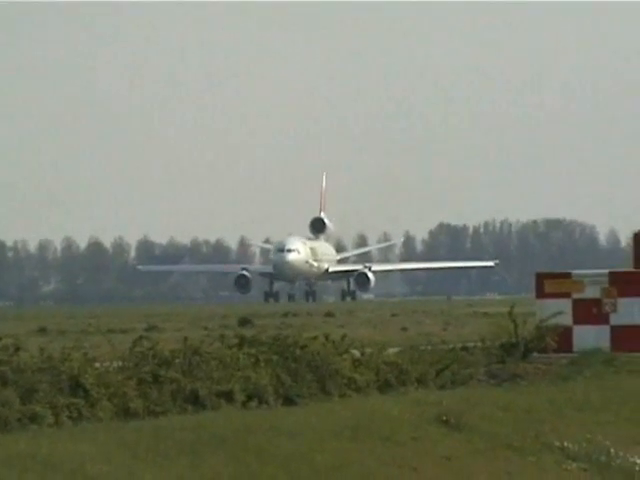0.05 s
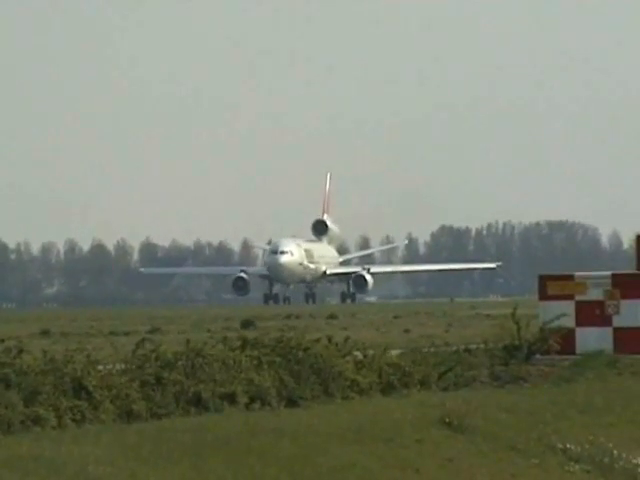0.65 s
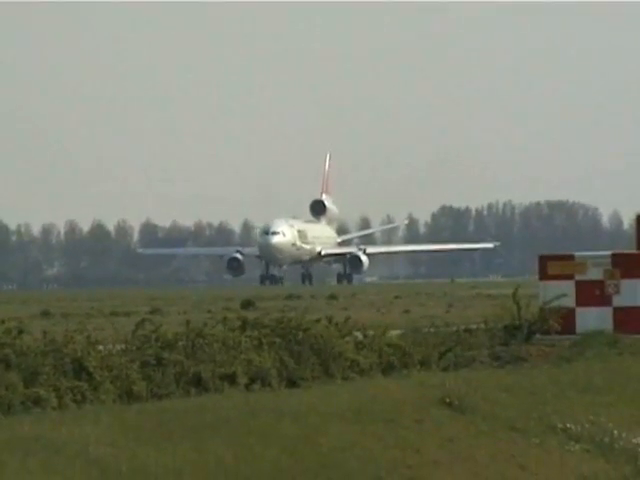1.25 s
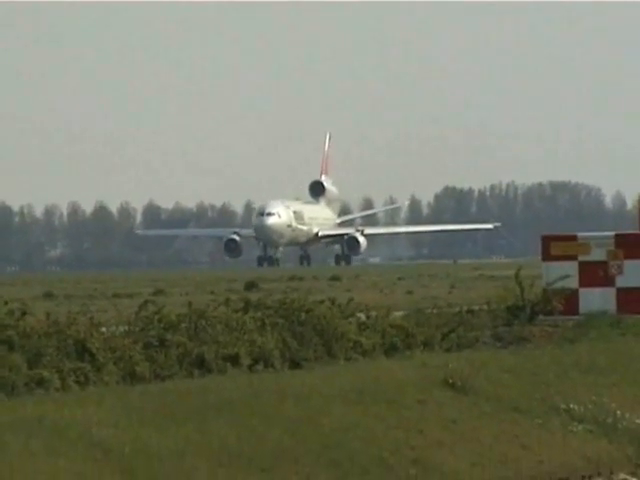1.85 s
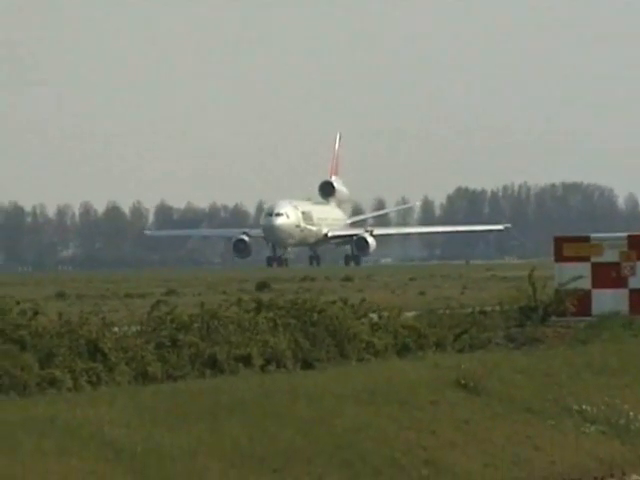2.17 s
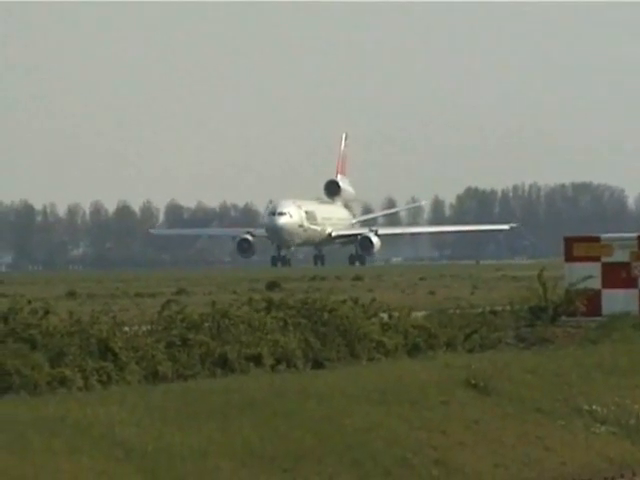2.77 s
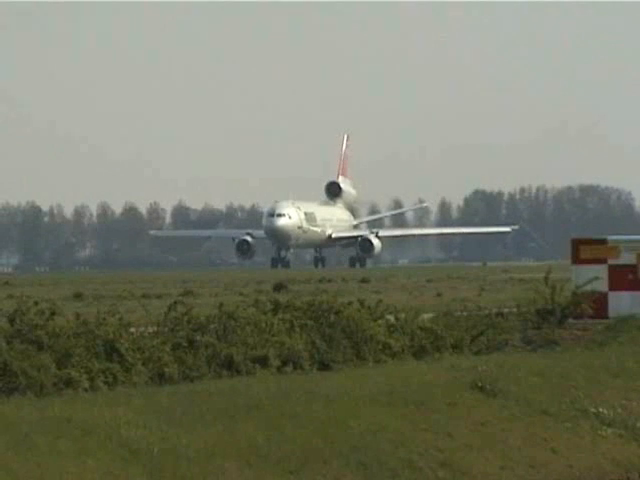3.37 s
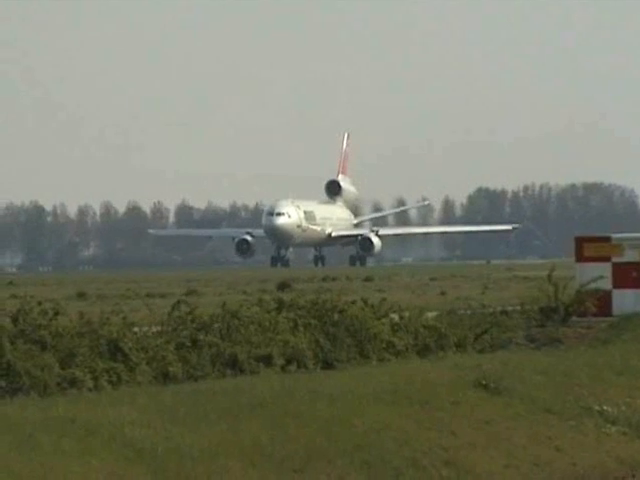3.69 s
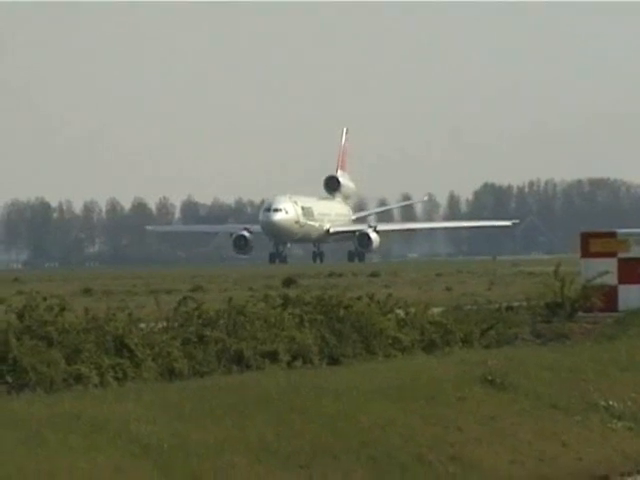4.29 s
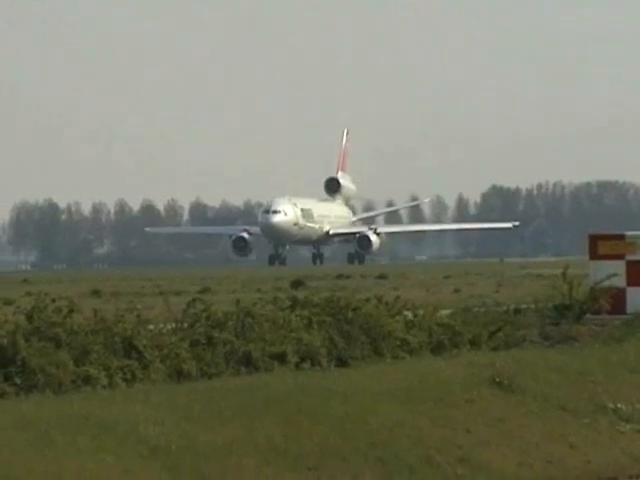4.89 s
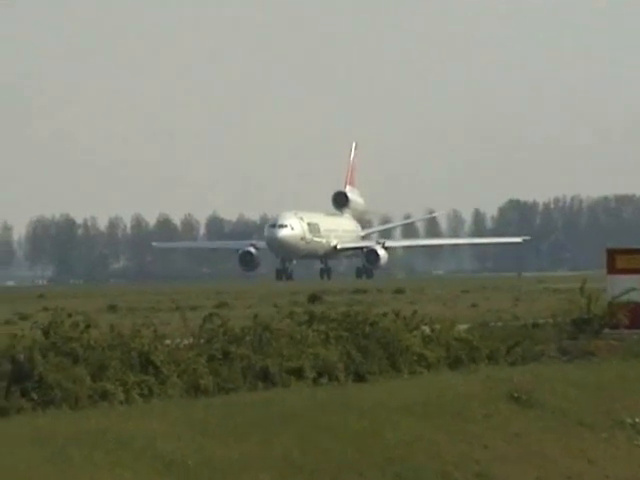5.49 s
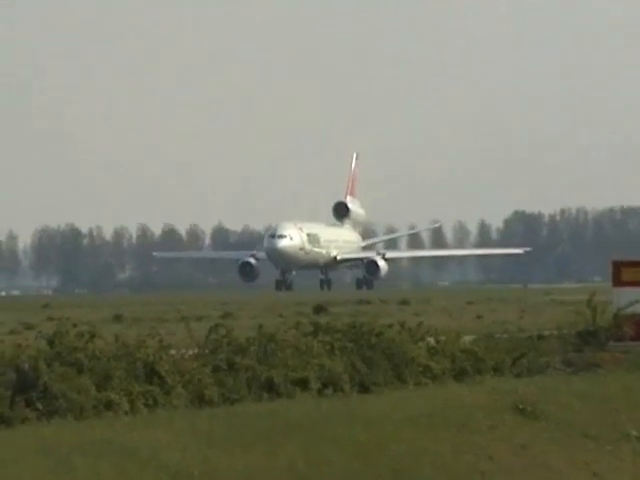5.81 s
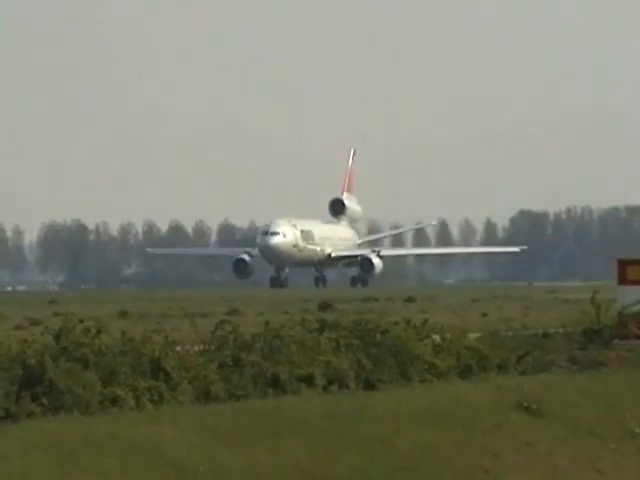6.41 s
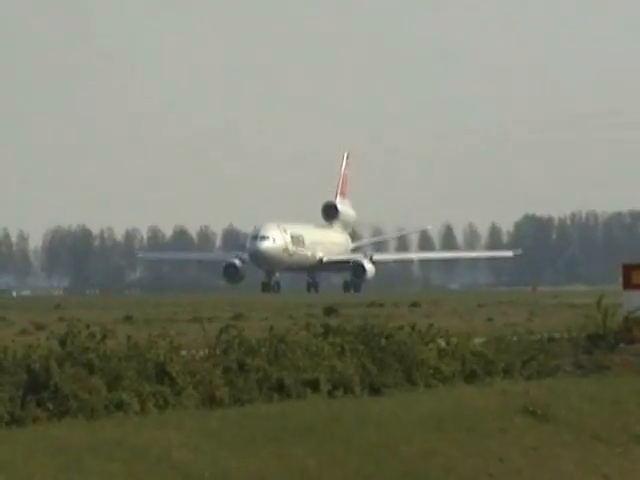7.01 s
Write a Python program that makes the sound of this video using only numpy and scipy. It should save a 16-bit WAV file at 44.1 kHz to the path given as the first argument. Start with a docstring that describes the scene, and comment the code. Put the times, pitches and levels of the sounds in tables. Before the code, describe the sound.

Jet engines spool up with a rising whine over a rushing roar, while wind gusts thump and crackle on the microphone.

```python
"""On the grass beside a runway, a three-engined airliner speeds up its engines for takeoff.
Three spinning fans whine higher and higher, each at its own speed, and shock waves from the blades buzz.
Air hisses into the engines and roars out behind them. Gusts thump and crackle on the microphone
and make the camera turn everything down, the aircraft included.
The loudest gust peaks are flattened and sound slightly rough."""
import sys
import numpy as np
from scipy import signal
from scipy.fft import rfft, irfft, next_fast_len
from scipy.io import wavfile

SR = 44100
rng = np.random.default_rng(int(sys.argv[2]) if len(sys.argv) > 2 else 0)


def generate_wav(signal):
    """Clip the signal to [-1, 1] and save it as 16-bit WAV at the path in sys.argv[1]."""
    frames = np.transpose(np.atleast_2d(signal))
    scaled = np.clip(frames, -1, 1) * 32767
    pcm = np.round(scaled).astype(np.int16)
    wavfile.write(sys.argv[1], SR, pcm)


N = 310905
TIME_S = np.arange(N) / SR
BLADES = 38   # on each fan


def from_db(db):
    """Turn decibels into a number to multiply a sound by."""
    return 10 ** (np.asarray(db) / 20)


def unit_power(x):
    """Scale a signal so that its average power is 1."""
    return x / np.sqrt(np.mean(np.abs(x) ** 2) + 1e-20)


def over_time(rows):
    """Join a table's rows with straight lines: one curve for each column after the time."""
    times_s, *columns = np.transpose(rows)
    return [np.interp(TIME_S, times_s, column) for column in columns]


def at_pitch(rows, hz):
    """Look up a table's value at a pitch, spacing the octaves evenly."""
    pitches_hz, values = np.transpose(rows)
    return np.interp(np.log(hz + 1), np.log(pitches_hz), values)


def smooth(x, seconds):
    """Soften sudden changes by following them with a lag."""
    keep = np.exp(-1 / (seconds * SR))
    return signal.lfilter([1 - keep], [1, -keep], x)


def drift(per_s):
    """A random wander of about 1 either way, changing roughly per_s times a second."""
    keep = np.exp(-40 * np.pi * per_s / SR)
    noise = rng.standard_normal(N // 20 + 4002)   # one value every 20 samples, plus a run-in
    slow = signal.lfilter([1], [1, -2 * keep, keep * keep], noise)[4000:]
    return np.interp(np.arange(N) / 20, np.arange(len(slow)), unit_power(slow))


def stereo_noise(colour, likeness):
    """Coloured noise whose left and right are the same (likeness 1), unrelated (0) or opposite (-1)."""
    size = next_fast_len(N, real=True)
    hz = np.arange(size // 2 + 1) * SR / size
    shared, opposed = rfft(rng.standard_normal((2, size))) * from_db(at_pitch(colour, hz))
    alike = np.clip(at_pitch(likeness, hz), -1, 1)
    spectrum = np.sqrt(1 + alike) * shared + np.sqrt(1 - alike) * opposed * [[1], [-1]]
    return unit_power(irfft(spectrum, size)[:, :N])


def scattered_tone(hz, waver, fuzz, waver_hz, fuzz_hz):
    """A tone that has crossed swirling air: it wavers slowly and gains a fast, noisy fuzz."""
    slow = drift(waver_hz) + 1j * drift(waver_hz)
    fast = drift(fuzz_hz) + 1j * drift(fuzz_hz)
    pure = np.exp(2j * np.pi * np.cumsum(hz) / SR)
    return unit_power(np.real(pure * (1 + waver * slow + fuzz * fast)))


# How strong a fan's sounds are at each speed: whine_hz, whine_db, blade_tone_db, buzz_db
FAN_LEVELS = [(1520, -41.5, -66, -42), (1940, -35.5, -52.5, -40.5), (2270, -38.5, -58, -38.5),
              (2416, -32.5, -54.5, -43), (2990, -39.5, -41.5, -50), (3288, -47.5, -49, -41),
              (3540, -50, -38.5, -50), (3740, -51, -37.5, -45), (3840, -49.5, -30.5, -47)]

def fan_levels(whine_hz):
    """As a fan speeds up, its whine gives way to the tone of the passing blades, an octave lower."""
    pitches_hz, *columns = np.transpose(FAN_LEVELS)
    return [np.interp(whine_hz, pitches_hz, column) for column in columns]


# The octave above the whine grows with speed until the air soaks it up: whine_hz, gain_db
OCTAVE_LEVEL = [(1520, -17), (1600, -6), (1700, -4.5), (1780, -8), (1900, -7.5), (2030, -16), (2150, -28),
                (2700, -45)]
# A tone at three times the blade tone's pitch shows at middle speed: whine_hz, gain_db
TRIPLE_LEVEL = [(1800, -28), (1920, -16), (2060, -11), (2200, -17), (2400, -30)]

def fan(hz, whine_db, blade_db, octave_db, triple_db, waver):
    """One fan whining at hz: passing blades make a tone, with more at 2 (the whine), 3 and 4 times it."""
    base_db, blade_base_db, _ = fan_levels(hz)
    scatter = (hz / 2200) ** 2   # shorter waves are scattered more
    whine = from_db(base_db + whine_db + 1.4 * drift(per_s=13))
    whine *= scattered_tone(hz, waver * scatter, 0.29 * scatter, waver_hz=16, fuzz_hz=70)
    octave = from_db(base_db + octave_db + at_pitch(OCTAVE_LEVEL, hz))
    octave *= scattered_tone(2 * hz, 0.6, 0.06, waver_hz=8, fuzz_hz=69)
    triple = from_db(base_db + triple_db + at_pitch(TRIPLE_LEVEL, hz))
    triple *= scattered_tone(3 * hz / 2, 0.54, 0.13, waver_hz=6.3, fuzz_hz=60)
    # The blade tone is ragged until the blade tips are fast, then it throbs.
    ragged_db = np.minimum((3300 / hz) ** 3, 3)
    throb_hz, throb_depth_db, throb_above_hz = 7.9, 3.5, 3250
    throb_db = throb_depth_db * smooth(hz > throb_above_hz, 0.1) * np.cos(2 * np.pi * throb_hz * TIME_S)
    blade = from_db(blade_base_db + blade_db + throb_db + ragged_db * drift(per_s=24))
    blade *= scattered_tone(hz / 2, 0.25 * ragged_db, 0.25 * ragged_db, waver_hz=11.5, fuzz_hz=50)
    return whine + octave + triple + blade


# The rising whine of the main fan, the slowest and loudest: time_s, pitch_hz
MAIN_PITCH = [(0, 1521), (0.8, 1572), (1.5, 1590), (2.4, 1655), (3.0, 1753), (3.5, 1881), (4.0, 2085),
              (4.5, 2321), (5.5, 2787), (6.0, 3087), (6.5, 3350), (7.05, 3604)]
# How far above it the other two fans whine: time_s, second_fan_hz, third_fan_hz
PITCH_GAPS = [(0, 168, 226.5), (1.5, 136.7, 260.7), (2.4, 149.5, 266.5), (3.5, 259.6, 331.7),
              (4.0, 280.5, 283.3), (4.5, 262.5, 240.3), (5.5, 230.6, 295.6), (6.4, 285.9, 390),
              (7.05, 244, 363)]
# The wind carries the main whine over in swells: time_s, gain_db
MAIN_SWELLS = [(0, 5), (0.15, 3.5), (0.22, 10.5), (0.33, 10), (0.43, 9), (0.53, 8), (0.68, 8.5), (0.85, 3),
               (1.0, -2), (1.18, 9.5), (1.3, -5), (1.46, 3), (1.54, 13), (1.66, -5), (1.84, 10), (1.98, 11),
               (2.12, 8), (2.23, 12), (2.38, 3), (2.55, 11.5), (2.7, 16), (2.9, 5), (3.06, 10), (3.4, 0.5),
               (4.0, -0.5), (4.43, 6), (4.62, -1.5), (4.9, -1.5), (5.15, -4), (5.38, -1.5), (5.52, 1.5),
               (5.62, -12), (5.73, 5), (5.83, 2), (5.95, 2), (6.18, 0.5), (6.28, 9), (6.5, -7.5),
               (7.05, -1)]
# Brief dips in the main whine (a negative depth is a lift): time_s, depth_db
MAIN_DIPS = [(0.47, 11), (0.61, 13), (0.76, 15), (1.485, 10), (2.075, 23), (2.33, 13), (3.19, -4),
             (3.66, -10.5), (4.04, -3), (4.18, 6), (4.58, 21), (4.78, 14), (4.97, 4), (5.16, 5)]
# Swells of the other two whines: time_s, second_fan_db, third_fan_db
OTHER_SWELLS = [(0, -6, 1), (0.3, -3.5, 2), (0.9, -1, -1), (1.22, -11, 1), (1.35, 11, 1.5), (1.47, -2, 2),
                (1.54, 5, 7), (1.68, -1, -12), (1.8, 3, 9), (1.92, 0, -4), (2.08, 13.5, -1), (2.2, -2, -1),
                (2.4, -2, 3), (2.65, 3, 2), (2.8, -2, 9), (3.0, 5, 4), (3.4, -1.5, -1.5), (3.87, 4, 4.5),
                (4.0, -10, -3.5), (4.21, -3, 3.5), (4.37, -5, -6), (4.55, -4, -2), (4.72, 3, 5),
                (4.92, 5, 2), (5.05, 2.5, -11), (5.17, 4.5, 3), (5.28, 2, -13), (5.4, 5, 4), (5.6, 5, 9.5),
                (5.75, 5, -1), (6.4, 1.5, 4), (7.05, -5, 0)]

def three_fans():
    """Three fans speed up slightly apart, and each whine swells and fades on its way over the grass."""
    hz, = over_time(MAIN_PITCH)
    second_gap_hz, third_gap_hz = over_time(PITCH_GAPS)
    swell_db, = over_time(MAIN_SWELLS)
    second_db, third_db = over_time(OTHER_SWELLS)
    half_width_s = 0.033
    dip_db = sum(depth_db * np.exp(-((TIME_S - time_s) / half_width_s) ** 2)
                 for time_s, depth_db in MAIN_DIPS)
    return (fan(hz, swell_db - dip_db + 4.5, blade_db=4, octave_db=-1.8, triple_db=-0.2, waver=0.15)
            + fan(hz + second_gap_hz, second_db, blade_db=4, octave_db=-13, triple_db=-19, waver=0.38)
            + fan(hz + third_gap_hz, third_db, blade_db=-3, octave_db=-16, triple_db=-20, waver=0.29))


# The echo off the ground makes some pitches of the buzz stronger: pitch_hz, level_db
BUZZ_COLOUR = [(300, -14), (450, 2), (570, 4.5), (670, -2), (780, -3), (1000, 6), (1150, 2.5), (1400, -13),
               (1800, 6)]

def blade_buzz(whine_hz):
    """No two blades are alike, so their shock waves buzz like a saw at multiples of the spin rate."""
    spin_hz = whine_hz / (2 * BLADES)
    turn = np.exp(2j * np.pi * np.cumsum(spin_hz) / SR)
    wavers = [drift(10) + 1j * drift(6.5) for _ in range(7)]
    uneven_db = 6
    tone, buzz = np.ones(N, complex), 0
    for multiple in range(1, BLADES + 8):
        tone = tone * turn   # step up to the next multiple
        if multiple > BLADES // 3:
            colour = np.repeat(from_db(at_pitch(BUZZ_COLOUR, multiple * spin_hz[::20])), 20)[:N]
            waver = np.roll(wavers[multiple % len(wavers)], rng.integers(N))
            buzz = buzz + from_db(uneven_db * rng.normal()) * colour * np.real(tone * waver)
    _, _, buzz_db = fan_levels(whine_hz)
    return from_db(buzz_db) * unit_power(buzz)


# How loud the air is leaving and entering the engines: time_s, roar_db, intake_db
JET_LEVELS = [(0, -46, -40), (1.2, -33, -34.5), (2.3, -32, -35), (2.7, -29, -33.5), (3.0, -31, -32),
              (4.5, -33.5, -33), (5.6, -32, -31.5), (6.35, -31, -32), (6.52, -33, -35), (7.05, -37, -31.5)]
# The deep roar of the exhaust: pitch_hz, level_db
ROAR_COLOUR = [(60, 7.5), (200, 5.5), (400, -5), (570, -1), (660, -5.5), (770, -9), (1000, -14.5),
               (1400, -18.5), (1750, -14.5), (2600, -18.5), (5000, -35)]
# The hiss of air being sucked in: pitch_hz, level_db
INTAKE_COLOUR = [(800, -9), (1400, 0), (1900, -3), (2400, -5), (2900, -8), (3300, -10), (4000, -14.5),
                 (5000, -19.5), (6500, -30), (10000, -51)]
# How alike both sound on the left and right: pitch_hz, likeness
ENGINE_LIKENESS = [(100, 1), (500, 0.47), (1200, 0.94), (2500, 1), (5000, 0.87)]

def roar_and_intake():
    """Air roars out of the back of the engines and hisses in at the front, both a little unsteadily."""
    roar_db, intake_db = over_time(JET_LEVELS)
    roar = from_db(roar_db + 2 * drift(8.8)) * stereo_noise(ROAR_COLOUR, ENGINE_LIKENESS)
    intake = from_db(intake_db + 1.3 * drift(10.5)) * stereo_noise(INTAKE_COLOUR, ENGINE_LIKENESS)
    return roar + intake


# The microphone's own thin hiss: pitch_hz, level_db
MIC_HISS_COLOUR = [(1000, -57), (3500, -14.5), (5300, 6), (6200, -8.5), (7000, 0), (7800, -8.5),
                   (9300, 1.5), (10500, -9.5), (11500, -19), (14000, -30)]
# How alike it is on the left and right: pitch_hz, likeness
MIC_HISS_LIKENESS = [(3000, 0.75), (6000, 0.45), (9000, 0.28)]

def microphone_hiss(level_db):
    """The microphone adds a faint, steady hiss of its own."""
    return from_db(level_db) * stereo_noise(MIC_HISS_COLOUR, MIC_HISS_LIKENESS)


# Gusts that strike the microphone: start_s, length_s, first_db, last_db
GUST_HITS = [(0.0, 0.071, 2, -1), (0.195, 0.0085, -7, -6), (0.334, 0.026, -7.5, -3.5),
             (0.436, 0.304, -7.5, 2.5), (0.808, 0.19, 1, 8), (1.05, 0.027, -4, -0.5), (1.203, 0.059, 2, -1),
             (1.38, 0.015, 1.5, -6.5), (1.603, 0.13, -3, -6.5), (1.716, 0.078, -11, -12),
             (1.993, 0.0081, -3.5, -8), (2.042, 0.0048, -6, -6.5), (2.181, 0.089, -9, -3),
             (2.322, 0.27, 1, 4.5), (2.737, 0.022, -12.5, -14.5), (2.96, 0.0041, -6, -6),
             (3.02, 0.016, -2.5, -4), (3.626, 0.017, -17, -20.5), (3.761, 0.052, -15, -23.5),
             (3.95, 0.02, -27, -16.5), (4.148, 0.028, -23.5, -24.5), (5.597, 0.296, -7, 7.5),
             (5.893, 0.19, 2.5, 5), (6.086, 0.19, -1, -2.5), (6.361, 0.14, -10, -16), (6.47, 0.39, -7, -2),
             (6.789, 0.3, 1, -0.5)]

def gust_levels(lull_db, rise_db_per_s, fall_db_per_s):
    """The wind's push in dB: each gust leaps out of the lull, swells or sags, then dies away."""
    level_db = lull_db
    for start_s, length_s, first_db, last_db in GUST_HITS:
        held_db = np.interp(TIME_S, [start_s, start_s + length_s], [first_db, last_db])
        rise_db = rise_db_per_s * np.maximum(start_s - TIME_S, 0)
        fall_db = fall_db_per_s * np.maximum(TIME_S - start_s - length_s, 0)
        level_db = np.maximum(level_db, held_db - rise_db - fall_db)
    return level_db


def swirls(per_s, spread_db, decay_s):
    """The lumpy strength of small swirls of air that strike at random and are quickly spent."""
    strikes = rng.random(N) < per_s / SR
    strengths = from_db(-spread_db * np.clip(rng.standard_normal(N), -2, 2))
    return unit_power(smooth(smooth(strikes * strengths + 1e-18, decay_s), 0.0058))


# The strength of the breeze: time_s, level_db
BREEZE_LEVEL = [(0, -16), (0.21, -18), (0.28, -15), (0.72, -5), (1.15, -7.5), (1.42, -4), (1.53, -9.5),
                (1.68, -4.5), (2.02, -8), (2.12, -18.5), (2.2, -7), (2.35, -24), (2.55, -1), (2.82, -19.5),
                (3.02, -4), (3.22, -18.5), (3.42, -24), (3.58, -17), (3.75, -27.5), (4.1, -22.5),
                (4.68, -24), (4.78, -16), (4.87, -16.5), (4.96, -19.5), (5.2, -25), (5.27, -11.5),
                (5.34, -16), (5.44, -19.5), (5.55, -18), (5.62, -12), (5.85, -15), (6.2, -5), (6.34, -17.5),
                (6.45, -14.5), (6.7, -27), (7.05, -7)]
# The rumble of big swirls of air: pitch_hz, level_db
RUMBLE_COLOUR = [(4, -47), (12, -14), (24, -3), (40, 9.5), (65, 8), (90, 3.5), (130, 0.5), (250, -61)]
# Big swirls cover both microphone openings at once, so the sides are less opposed: pitch_hz, likeness
BIG_SWIRL_LIKENESS = [(30, 0.6), (60, -0.12), (100, -0.37), (160, -0.12)]
# The thumping of smaller swirls: pitch_hz, level_db
THUMP_COLOUR = [(50, -24.5), (80, 5), (120, 1.5), (220, -1.5), (330, -9.5), (450, -25.5), (700, -35),
                (1500, -85)]
# The flutter of the smallest: pitch_hz, level_db
FLUTTER_COLOUR = [(200, -16.5), (380, 7.5), (520, -1.5), (750, -8.5), (1100, -15.5), (2000, -22.5),
                  (3000, -32), (4500, -40.5), (9000, -63), (14000, -80)]
# The two close openings turn small swirls into partly opposite signals: pitch_hz, likeness
SMALL_SWIRL_LIKENESS = [(30, -0.45), (70, -0.68), (150, -0.79), (300, -0.53), (600, -0.46), (1200, -0.46),
                        (3000, 0.13)]

def wind():
    """Big swirls of air rumble; smaller ones thump and flutter in uneven lumps."""
    breeze_db, = over_time(BREEZE_LEVEL)
    lull_db = breeze_db - 13.5 + 4.5 * drift(per_s=9.2)
    gust_db = gust_levels(lull_db, rise_db_per_s=793, fall_db_per_s=270)
    lumpiness = np.clip((gust_db + 67) / 30, 0, 1)   # full except in the quietest lulls
    lumps = 1 + lumpiness * (swirls(per_s=420, spread_db=2, decay_s=0.0035) - 1)
    rumble_gain = np.hypot(from_db(breeze_db - 2), from_db(gust_db - 13))
    rumble = rumble_gain * stereo_noise(RUMBLE_COLOUR, BIG_SWIRL_LIKENESS)
    thumps = (0.57 + smooth(lumps, 0.00041)) * stereo_noise(THUMP_COLOUR, SMALL_SWIRL_LIKENESS)
    flutter = (0.04 + lumps) * stereo_noise(FLUTTER_COLOUR, SMALL_SWIRL_LIKENESS)
    flutter_db = 1.12 * gust_db - 12   # grows faster than the thumping
    return rumble + from_db(gust_db + 1.5) * unit_power(thumps) + from_db(flutter_db) * unit_power(flutter)


def air_bursts(rows, colour, gain_db, decay_s):
    """Short bursts of wind noise that start sharply and die quickly."""
    strikes = np.zeros(N)
    for start_s, level_db in rows:
        strikes[int(start_s * SR)] = from_db(level_db + gain_db)
    loudness = smooth(smooth(strikes + 1e-18, decay_s), 0.0021) * decay_s * SR
    return loudness * stereo_noise(colour, SMALL_SWIRL_LIKENESS)


# The hardest slaps of wind: start_s, level_db
SLAP_HITS = [(0.025, -3), (0.473, -12.5), (0.773, -6), (0.879, 0), (0.938, 3.5), (1.217, -3), (1.645, 0),
             (2.188, -8.5), (2.203, -7.5), (2.34, -3), (2.388, 1), (2.439, -4), (2.965, -11.5), (3.02, -14),
             (5.626, -6.5), (5.909, 2.5), (6.005, -4), (6.22, -6.5), (6.871, -6)]
# The dull sound of a slap: pitch_hz, level_db
SLAP_COLOUR = [(100, -19), (300, 0.5), (550, 14.5), (1000, 3), (2000, -13), (4000, -23.5), (8000, -37.5),
               (14000, -47)]
# Brief crackles, most at the top of a gust: start_s, level_db
CRACKLE_HITS = [(0.027, -31.5), (0.897, -25), (1.608, -34), (1.648, -40), (2.204, -33), (2.343, -34),
                (2.888, -31.5), (2.966, -39), (3.021, -37), (5.629, -33), (5.925, -28)]
# The bright sound of a crackle: pitch_hz, level_db
CRACKLE_COLOUR = [(800, -5), (2000, -4), (5000, -1.5), (8000, -11.5), (12000, -15)]

def slaps_and_crackles():
    """The sharpest gusts slap the microphone's openings and crackle."""
    slaps = air_bursts(SLAP_HITS, SLAP_COLOUR, gain_db=-1, decay_s=0.0082)
    crackles = air_bursts(CRACKLE_HITS, CRACKLE_COLOUR, gain_db=1, decay_s=0.0056)
    return slaps + crackles


# How much louder the wind is on the left than on the right: pitch_hz, difference_db
LEFT_EXTRA = [(35, 5), (70, 5), (130, 1), (300, 0.95), (600, 1.7), (2000, 1.5)]

def wind_from_left(x):
    """The left opening faces the wind and catches more of the big swirls."""
    size = next_fast_len(N + SR // 10, real=True)
    extra_db = at_pitch(LEFT_EXTRA, np.arange(size // 2 + 1) * SR / size)
    gains = from_db(np.array([extra_db, -extra_db]) / 2)
    return irfft(rfft(x, size) * gains, size)[:, :N]


# Buzz notes that stand out near one pitch of the whine: spin_multiple, centre_hz, width_hz, level_db
BUZZ_NOTES = [(20, 2430, 55, -43), (35, 2150, 70, -42), (36, 2110, 90, -42), (38, 2130, 70, -42),
              (38, 2300, 45, -46), (38, 2660, 50, -38), (42, 2665, 45, -39)]

def buzz_notes(whine_hz):
    """Single notes of the buzz swell and sink again as the fan passes through certain speeds."""
    spin_hz = whine_hz / (2 * BLADES)
    notes = 0
    for multiple, centre_hz, width_hz, level_db in BUZZ_NOTES:
        swell = from_db(level_db) / (1 + ((whine_hz - centre_hz) / width_hz) ** 4)
        notes += swell * scattered_tone(multiple * spin_hz, 0.46, 0.3, waver_hz=14, fuzz_hz=35)
    return notes


def scene():
    """The airliner, the wind on the microphone and the microphone's own hiss, added together."""
    whine_hz, = over_time(MAIN_PITCH)
    tones = three_fans() + blade_buzz(whine_hz) + buzz_notes(whine_hz)
    lag_s = 0.00001   # the tones reach the right opening a moment later
    right_tones = np.interp(TIME_S - lag_s, TIME_S, tones)
    airliner = np.array([tones, right_tones]) + roar_and_intake()
    wind_noise = wind_from_left(wind() + slaps_and_crackles())
    return airliner + wind_noise + microphone_hiss(level_db=-51)


# How much of the repeating sound the camera takes away, from 0 to 1: pitch_hz, share
CANCEL_SHARE = [(200, 0.53), (2200, 0.96), (4300, 0.5), (8000, 1)]

def motor_noise_canceller(x, motor_hz, memory):
    """The camera subtracts what repeats with each turn of its motor, thinning multiples of that rate."""
    margin = SR // 10
    size = next_fast_len(N + 2 * margin, real=True)
    padded = np.pad(x, [(0, 0), (margin, size - N - margin)], mode="reflect")
    hz = np.arange(size // 2 + 1) * SR / size
    one_turn_delay = np.exp(-2j * np.pi * hz / motor_hz)
    repeating = (1 - memory) * one_turn_delay / (1 - memory * one_turn_delay)
    share = at_pitch(CANCEL_SHARE, hz)
    return irfft(rfft(padded) * (1 - share * repeating), size)[:, margin:margin + N]


def automatic_volume(x, threshold_db, slope, recover_db_per_s, react_s, listen_s, start_cut_db):
    """Loud sound turns the volume down and it climbs back steadily. The wind has it down at the start."""
    level_db = 10 * np.log10(smooth(np.mean(x ** 2, axis=0), listen_s) + 1e-12)
    wanted_cut_db = slope * np.maximum(level_db - threshold_db, 0)
    recovery_db = recover_db_per_s * TIME_S
    cut_db = np.maximum.accumulate(np.maximum(wanted_cut_db + recovery_db, start_cut_db)) - recovery_db
    return x * from_db(-start_cut_db - smooth(cut_db - start_cut_db, react_s))


def record(dry):
    """The camera thins repeating sound and turns gusts down. Peaks are flattened, the top treble is cut."""
    thinned = from_db(-2.3) * motor_noise_canceller(dry, motor_hz=150, memory=0.51)
    held = automatic_volume(thinned, threshold_db=-8, slope=1.15, recover_db_per_s=62,
                            react_s=0.026, listen_s=0.016, start_cut_db=10)
    flattened = held / (1 + held ** 10) ** (1 / 10)   # the loudest gust peaks sound slightly rough
    cutoff_hz = 11600
    return signal.sosfilt(signal.butter(14, cutoff_hz, fs=SR, output="sos"), flattened)


dry = scene()
out = record(dry)
generate_wav(out)
```